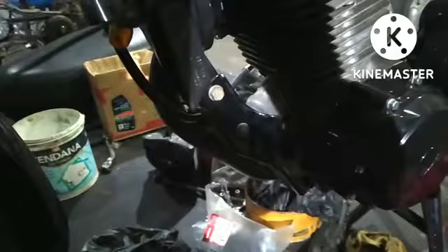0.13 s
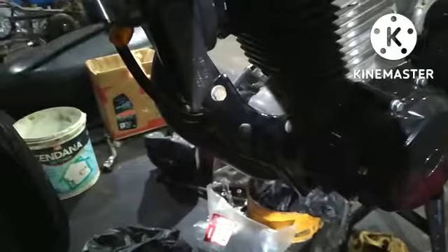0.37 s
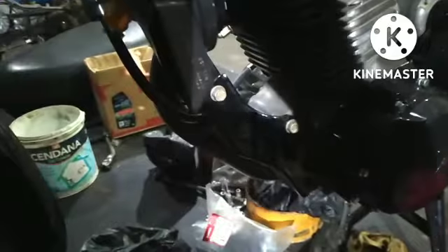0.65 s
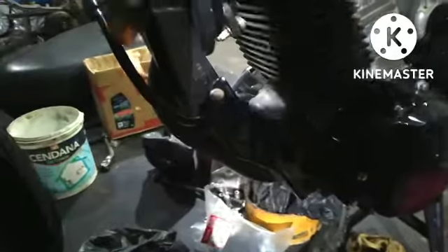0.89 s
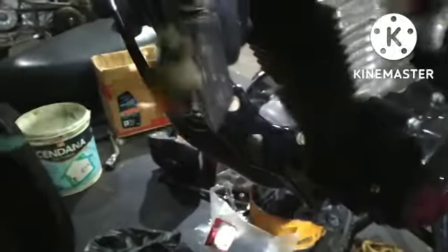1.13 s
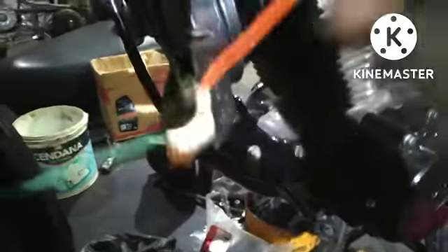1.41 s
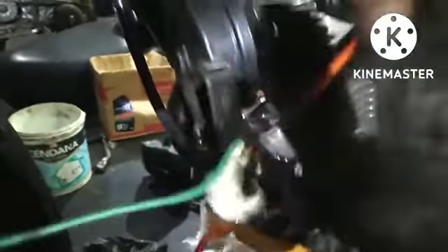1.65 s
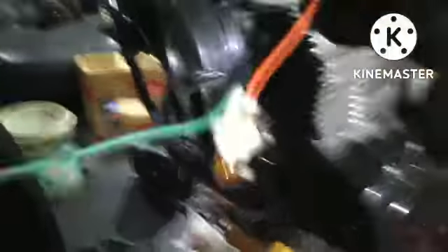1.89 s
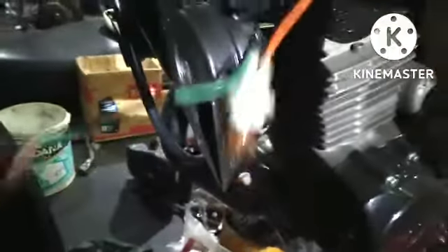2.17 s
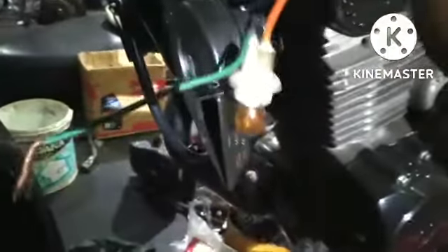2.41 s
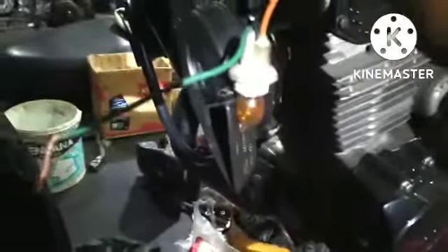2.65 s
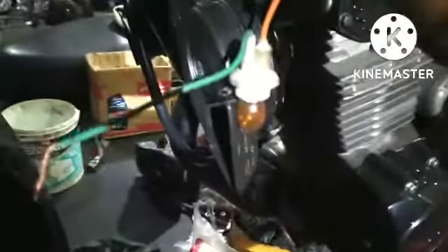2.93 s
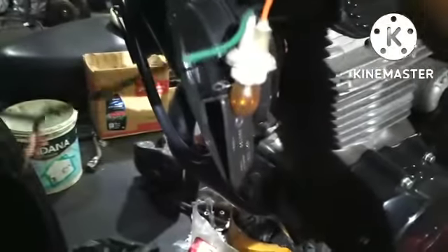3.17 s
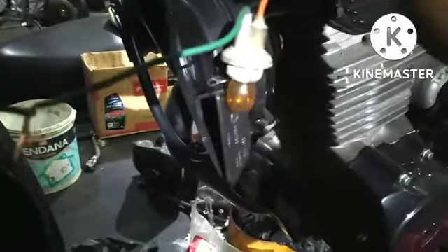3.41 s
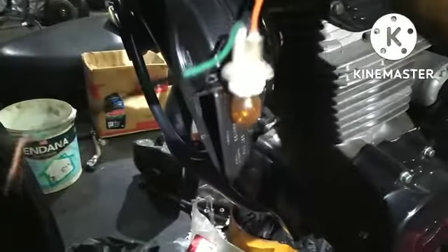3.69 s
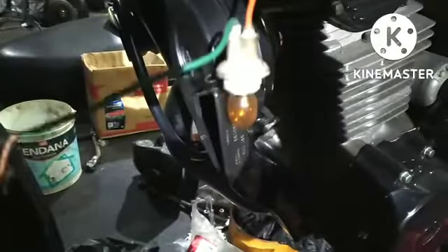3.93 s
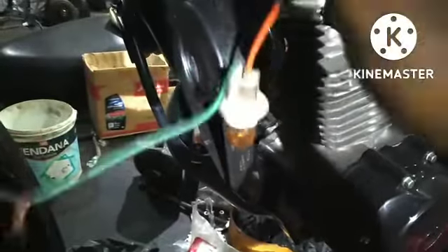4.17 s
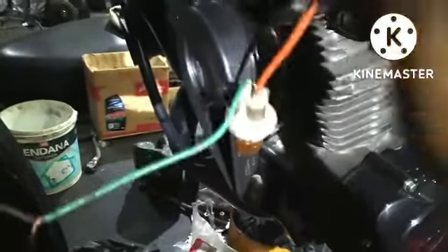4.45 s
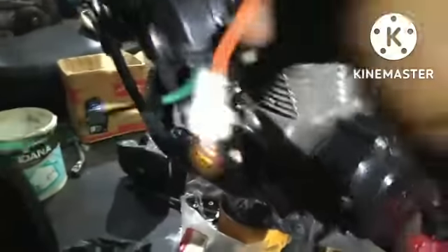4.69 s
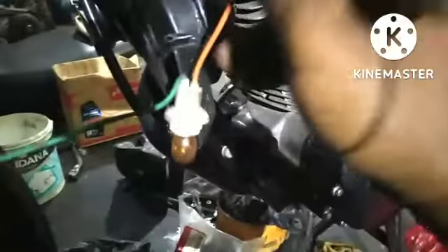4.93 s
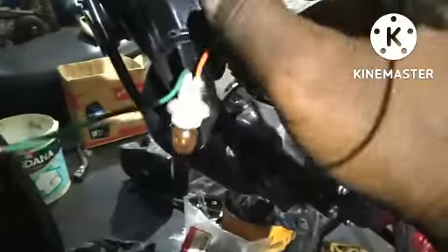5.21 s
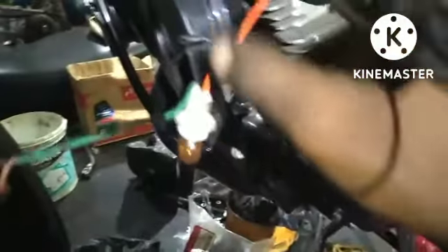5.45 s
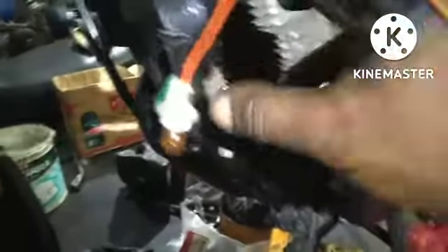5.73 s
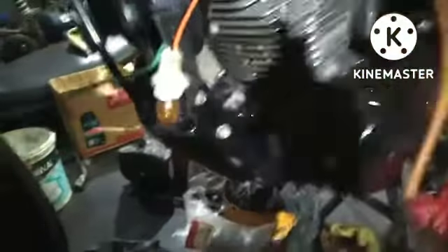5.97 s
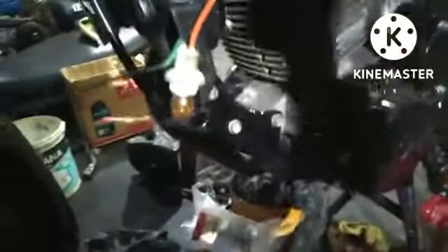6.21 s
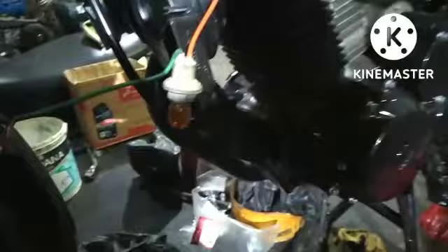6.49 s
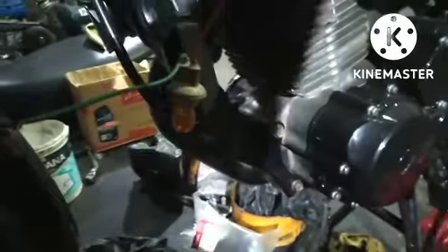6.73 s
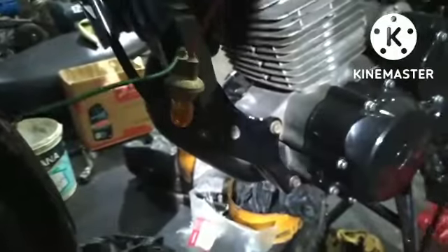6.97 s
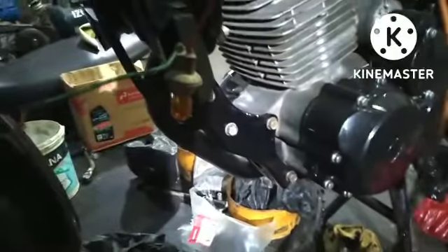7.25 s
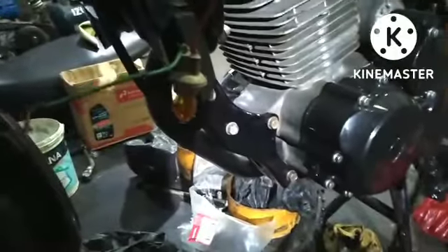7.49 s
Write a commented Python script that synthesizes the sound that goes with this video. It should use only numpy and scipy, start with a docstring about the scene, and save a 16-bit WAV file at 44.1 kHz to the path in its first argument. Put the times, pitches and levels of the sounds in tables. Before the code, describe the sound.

Small wire ends and a lamp holder click and clink close by, with bright scrubbing strokes over a faint distant compressor drone and puffing hiss.

```python
"""A workshop: a compressor drones far off as steady shaft harmonics, over a hiss that puffs once a shaft turn.
A bright scrubbing hiss comes in strokes: noise in many narrow bands that come and go.
Wire ends and a small lamp holder click and clink on metal close by: blows ring short modes, loose parts rattle.
Brief thin tones are rough and narrow with a flickering level; brief pings are soft, trembling tones."""
import sys
import numpy as np
from scipy import signal
from scipy.fft import rfft, irfft
from scipy.io import wavfile
from scipy.ndimage import map_coordinates

SR = 44100
rng = np.random.default_rng(int(sys.argv[2]) if len(sys.argv) > 2 else 0)


def gain_from_db(level_db):
    """Convert decibel levels to linear amplitude factors (20 dB per decade)."""
    decades = np.asarray(level_db, float) / 20
    return 10 ** decades


def persist_wave(psi):
    """Save psi, clipped to +-1, as 16-bit WAV."""
    counts = np.round(np.clip(psi, -1, 1) * 32767).astype(np.int16)
    wavfile.write(sys.argv[1], SR, np.atleast_2d(counts).T)


N = 336042
TIME = np.arange(N) / SR
SHAFT_HZ = 23.949

# Compressor harmonics with levels of their own: multiple of the shaft rate, level_db (relative)
HARMONICS = [(1, -35), (2, -15), (3, -17), (4, -8), (5, -6.5), (6, -7), (7, -10), (8, -0.5), (9, -13),
             (10, -24.5), (11, -7), (12, 1), (13, -16.5), (14, -12), (15, -17.5), (16, -4), (19, -10.5),
             (29, -9), (30, -9), (34, -5), (36, -5.5), (41, -8), (42, -5), (61, -13.5), (62, -6.5)]
# Colour of the workshop hiss: pitch_hz, density_db (per Hz, relative)
HISS_COLOUR = [(18, -32), (30, -9), (187, -7), (237, -1.5), (284, -6.5), (332, -13), (389, -7),
               (505, -16.5), (606, -2.5), (852, -3.5), (1360, -10.5), (2910, -10.5), (4660, -15),
               (7700, -13.5), (8720, -12.5), (10200, -9), (12200, -14), (15500, -17.5)]
# Brief thin tones: start_s, length_s, level_db (before the flicker), pitch_hz
THIN_TONE_EVENTS = [(0.562, 0.073, -58, 2890), (1.541, 0.078, -50.5, 2723), (1.808, 0.035, -51.5, 2740),
                    (1.971, .18, -54.5, 2756), (2.431, .08, -56, 2745), (2.499, 0.057, -51.5, 4995),
                    (2.811, 0.031, -53, 2690), (2.95, 0.097, -58, 3520), (2.982, 0.047, -59.5, 2730),
                    (3.98, 0.18, -53.5, 2740), (4.555, 0.13, -54, 2715), (4.832, 0.069, -53, 2743),
                    (5.139, 0.072, -52, 2730), (5.336, 0.166, -59, 2746), (5.87, 0.03, -60, 2720),
                    (6.12, 0.21, -59.5, 2855), (6.6, 0.079, -63, 2950), (6.74, 0.048, -58.5, 2352),
                    (6.907, 0.035, -52.5, 3590), (7.05, 0.12, -56, 3590)]
# Single pings: start_s, peak_db (before the trim and tremble), pitch_hz, length_s
PING_EVENTS = [(0.0044, -46.5, 8560, 0.022), (0.0638, -55, 8600, 0.02), (0.127, -56.5, 1255, 0.06),
               (0.403, -55, 8590, 0.048), (0.59, -49.5, 1245, 0.025), (0.689, -58, 1150, 0.02),
               (0.776, -49, 8320, 0.026), (0.82, -51, 8900, 0.02), (0.908, -46, 720, 0.049),
               (1.155, -52.5, 1467, 0.053), (1.401, -50, 1093, 0.021), (1.611, -41, 7920, 0.019),
               (1.654, -45.5, 9150, 0.022), (1.781, -35, 8300, 0.011), (1.82, -38, 7900, 0.02),
               (1.872, -52, 540, 0.019), (2.066, -44.5, 5900, 0.023), (2.158, -41, 7900, 0.016),
               (2.303, -50, 1300, 0.037), (2.407, -47, 7700, 0.015), (2.451, -46, 3460, 0.026),
               (2.714, -41.5, 5660, 0.021), (2.875, -43.5, 2100, 0.0098), (3.181, -36, 11200, 0.023),
               (3.217, -51.5, 1277, 0.034), (3.45, -57, 1093, 0.058), (3.744, -54, 4660, 0.022),
               (4.41, -54, 1680, 0.045), (4.766, -48, 5320, 0.013), (5.381, -51.5, 567, 0.025),
               (5.382, -49.5, 2130, 0.02), (5.495, -43.5, 3740, 0.014), (5.662, -46, 10500, 0.02),
               (5.674, -48, 5310, 0.013), (5.802, -54, 3340, 0.032), (5.908, -51.5, 3350, 0.037),
               (6.323, -52, 4430, 0.02), (6.76, -53, 4080, 0.022), (7.188, -47.5, 655, 0.0094)]
# Pitches that the fainter pings pick from: pitch_hz
FAINT_PITCHES = [1340, 1470, 2100, 2800, 2950, 3570, 4440, 5690, 7700, 8590]
# Clicks: start_s, peak_db (before a small trim), low_edge_hz, high_edge_hz,
# rattle_db (over the click, before a trim), rattle_t60_s (time to fall 60 dB)
CLICK_EVENTS = [(0.001, -34, 1100, 1830, -7.5, 0.22), (0.001, -34, 1840, 3250, -2, 0.3),
                (0.001, -38.5, 3570, 4820, -3, 0.21), (0.762, -28, 3830, 6860, -14, 0.15),
                (1.8636, -19, 1910, 5730, -19.5, 0.32), (1.8631, -17, 5650, 10400, -19.5, 0.28),
                (2.605, -21, 1950, 2900, -3.5, 0.064), (2.602, -16.5, 3480, 12100, -17, 0.18),
                (2.713, -27.5, 1850, 2800, -17, 0.081), (4.63, -42.5, 1900, 2880, 7.5, 0.06)]
# Modes of a connector that a click strikes: pitch_hz, width_hz, level_db
CONNECTOR_MODES = [(2770, 510, -2.5), (3650, 660, -1.5), (4440, 460, -0.5), (5550, 1000, 0), (6590, 170, 0),
                   (7100, 400, 1), (8600, 600, -4), (10400, 360, -7), (10900, 500, 8)]
# Clinks of the lamp holder: start_s, level_db
CLINK_EVENTS = [(2.604, -28.5), (2.695, -43), (2.716, -42), (4.633, -51.5)]
# Modes of the lamp holder: pitch_hz, width_hz, level_db, t60_s (time to fall 60 dB)
HOLDER_MODES = [(2069, 98, -8.5, 0.5), (2580, 350, -35, 0.055), (2740, 110, -8.5, 0.21),
                (4560, 780, -15, 0.29), (5650, 31, -8, 0.23), (6240, 150, -13, 0.026)]
# Scrubbing strokes: start_s, length_s, start_db, midway_db, last_push_db (before the contact lifts)
STROKE_EVENTS = [(0.953, 0.54, -51, -55.5, -45.5), (1.663, 0.25, -47.5, -51, -40),
                 (2.033, 0.11, -43, -44.5, -45.5), (2.397, .48, -40.5, -38, -34.5),
                 (3.159, .21, -48, -40.5, -36), (3.692, 0.83, -45, -43.5, -42), (4.664, 0.5, -46, -47, -42),
                 (5.287, 0.24, -50, -46.5, -38.5), (5.644, 0.3, -47, -40, -44),
                 (6.058, .56, -48, -39, -43.5), (6.715, .28, -50, -39, -38),
                 (7.122, 0.39, -44.5, -36.5, -41)]
# Colour of the scrubbing: pitch_hz, density_db (per Hz, relative)
SCRUB_COLOUR = [(2940, -51), (5000, 13), (5790, -29.5), (5900, -22.5), (6370, -13.5), (6710, -10),
                (7060, -12.5), (7800, -6), (8300, -1.5), (9750, -3.5), (10800, 2.5), (11400, 1.5),
                (13800, -11.5), (14900, -4.5), (15500, -8)]
# Outer scrubbing bands over the middle one, for a stroke of usual level:
# time_s, dull_edge_db, low_ring_db, bright_edge_db
BAND_BALANCE = [(1.0, -15, -9, -6), (1.3, -2, 4, -3), (1.55, -14, -2, -14), (1.9, 0, -4, 0),
                (2.12, -9.5, -7.5, -7), (2.45, -18.5, -8, -2), (2.85, -16, -7, 1), (3.25, -11, -12.5, -1),
                (3.9, -8, -3, 4), (4.4, -6.5, -7.5, 1), (4.9, -12, -4, -3.5), (5.452, -4.5, -8, 3),
                (5.8, -16, -10, 1), (6.2, -13.5, -4, 4), (6.9, -18, -9.5, 1.5), (7.35, -17, -10, 7)]


def noise():
    """White noise."""
    return rng.standard_normal(N)


def set_level(x, db):
    """Scale a sound to an rms level."""
    return x * gain_from_db(db) / np.sqrt(np.mean(x ** 2))


def walk(rate):
    """Random levels joined by straight lines, rate of them a second."""
    knots = rng.standard_normal(1000)
    return np.interp(TIME * rate, np.arange(1000), knots)


def resonate(x, hz, width_hz):
    """One resonance, gain 1 at its centre."""
    return signal.lfilter(*signal.iirpeak(min(hz, .45 * SR), hz / width_hz, fs=SR), x)


def coloured(points):
    """Noise whose spectrum follows pitch and level points."""
    hz, db = np.transpose(points)
    bins = np.arange(1, N // 2 + 2) * SR / N
    gain = gain_from_db(np.interp(np.log(bins), np.log(hz), db))
    return irfft(rfft(noise()) * gain, N)


def steep(x, low_hz, high_hz):
    """Band-pass with sharp edges."""
    edges = (.85 * low_hz, min(1.12 * high_hz, .45 * SR))
    return signal.sosfilt(signal.cheby2(5, 40, edges, "band", fs=SR, output="sos"), x)


def patchy(x, patch_hz, patch_s, depth_db, lift_db, above=0.81):
    """Narrow bands of a sound swell and fade, each in its own time; strong swells stand out further."""
    hz, s, frames = signal.stft(x, SR, nperseg=1024, noverlap=768)
    place = np.meshgrid(np.floor(hz / patch_hz), s / patch_s, indexing="ij")
    field = map_coordinates(rng.standard_normal((400, 600)), place, order=1, mode="wrap")
    gain = gain_from_db(depth_db * field + lift_db * np.clip(field - above, 0, .8))
    return signal.istft(frames * gain, SR, nperseg=1024, noverlap=768)[1][:N]


def puffs(depth):
    """A gain that jumps up once a shaft turn and dies away until the next, like puffs of air."""
    left_of_turn = -(TIME * SHAFT_HZ + .55) % 1  # falls from 1 to 0
    return 1 + depth * np.exp(left_of_turn / 1.16)


def add(out, s, sound):
    """Mix a short sound in at a time."""
    i = max(int(s * SR), 0)
    out[i:i + len(sound)] += sound[:N - i]


def compressor():
    """A turning shaft gives steady harmonics, each wavering a little."""
    others_db = -17 + 0.5 * rng.standard_normal(size=63)  # the other multiples, all near one level
    levels = dict(enumerate(others_db)) | dict(HARMONICS)
    t = TIME[::8]  # low tones need only an eighth of the samples
    tones = np.zeros(len(t))
    for k in range(1, len(levels)):
        gain = gain_from_db(levels[k] + walk(4.8)[::8])  # wavers by about 1 dB
        tones += gain * np.sin(2 * np.pi * (k * SHAFT_HZ * t + rng.random()))
    return set_level(signal.resample_poly(tones, 8, 1)[:N], -64.5)


def workshop_hiss():
    """Coloured noise puffs once a shaft turn and narrow bands of its upper part flicker."""
    low_cut = signal.butter(4, 45, "high", fs=SR, output="sos")
    hiss = signal.sosfilt(low_cut, coloured(HISS_COLOUR)) * puffs(1.0)
    upper = steep(coloured(HISS_COLOUR), 920, 10560)
    flicker = patchy(upper, 190, .04, 1.34, 11.2) * puffs(0.84)
    return set_level(hiss, -61) + set_level(flicker, -64.0)


def thin_tones():
    """Brief, rough narrow tones, a sine plus a narrow band of noise, with a flickering level."""
    edge_s, width_hz, roughness = .012, 40, .45
    out, source = np.zeros(N), noise()
    for s, length, db, hz in THIN_TONE_EVENTS:
        t = TIME[:int((length + 4 * edge_s) * SR)]
        rough = set_level(resonate(source[int(s * SR):][:len(t)], hz, width_hz), 0)
        tone = np.sin(2 * np.pi * hz * t) + roughness * rough
        rise = 1 - np.exp(-t / edge_s)
        fall = np.exp(-np.maximum(t - length, 0) / edge_s)
        add(out, s, set_level(tone, db) * rise * fall)
    flicker_db = 5 * walk(48) - 2.5
    return out * gain_from_db(flicker_db)


def pings():
    """Short soft tones swell and fade, blurred by a tremble; fainter ones come at random."""
    out, faint = np.zeros(N), []
    for when, size, pick, long in rng.random(size=(60, 4)):
        db = -61 - 2.5 * np.log(size)  # a few come out much louder
        hz = FAINT_PITCHES[int(pick * len(FAINT_PITCHES))]
        faint.append((when * N / SR, db, hz, .03 * (.5 + long)))
    for s, db, hz, length in PING_EVENTS + faint:
        t = TIME[:int(2 * length * SR)]
        swell = t / length * 4
        envelope = swell * np.exp(1 - swell)  # peaks at a quarter of the length
        tone = np.sin(2 * np.pi * (hz * t + rng.random()))
        add(out, s - .004, gain_from_db(db - 2.0) * envelope * tone)
    tremble_db = 3.9 * walk(120)
    return out * gain_from_db(tremble_db)


def clicks():
    """A blow rings the connector's short modes for a few ms, then loose parts rattle in a band."""
    out, t = np.zeros(N), TIME[:SR // 2]
    loose = set_level(patchy(noise(), 240, .12, 3.5, 5.0), 0)
    for s, db, low_hz, high_hz, rattle_db, t60 in CLICK_EVENTS:
        # one sharp sample and a short burst of noise
        blow = (t == 0) + 0.3 * np.exp(-t / 0.0023) * rng.standard_normal(len(t))
        ringing = sum(gain_from_db(g) * resonate(blow, hz, width) for hz, width, g in CONNECTOR_MODES)
        crack = steep(ringing, low_hz, high_hz)
        add(out, s, gain_from_db(db + 0.5) * crack / np.abs(crack).max())
        shaken = set_level(steep(np.roll(loose, -int(s * SR))[:len(t)], low_hz, high_hz), -1.2)
        add(out, s, gain_from_db(db + rattle_db - 60 * t / t60) * (1 - np.exp(-t / 0.0052)) * shaken)
    return out


def clinks():
    """The loose lamp holder chatters, so its modes ring roughly, with a brief clean ring at the start."""
    strike_db, strike_t60_s = 8.5, 0.035
    out, t = np.zeros(N), TIME[:SR // 2]
    for s, db in CLINK_EVENTS:
        rings = np.zeros(len(t))
        for hz, width, g, t60 in HOLDER_MODES:
            rough = resonate(resonate(rng.standard_normal(len(t)), hz, width), hz, width)
            rings += set_level(rough, 0) * gain_from_db(g - 60 * t / t60)
            clean = np.sin(2 * np.pi * (hz * t + rng.random()))
            rings += clean * gain_from_db(g + strike_db - 60 * t / strike_t60_s)
        add(out, s, gain_from_db(db) * rings * (1 - np.exp(-t / 0.00033)))
    return out


def strokes():
    """Pressure of the contact in dB, and a gain that opens fast and fades when the contact lifts."""
    attack_s, release_db_per_s = 0.035, 319
    lift_s = 0.044  # the fade eases in over about this time
    midway, sag_db = 0.57, -2.5  # share of the time up to the last push; sag below midway just before it
    knots, contact = [], np.zeros(N)
    for s, length, first_db, mid_db, last_db in STROKE_EVENTS:
        push = min(0.1, length / 4)  # seconds of the last push
        knots += [(s, first_db), (s + midway * (length - push), mid_db)]
        knots += [(s + length - push, mid_db + sag_db), (s + length, last_db)]
        lifted = np.maximum(TIME - s - length, 0)
        fade_db = -release_db_per_s * (np.hypot(lifted, lift_s) - lift_s)
        opening = np.clip((TIME - s) / attack_s, 0, 1) ** 2
        contact = np.maximum(contact, opening * gain_from_db(fade_db))
    return np.interp(TIME, *np.transpose(knots)) + 1.2 * walk(14), contact


def scrubbing():
    """Bright hiss in strokes, in many narrow bands that come and go."""
    db, contact = strokes()
    usual_db = -46
    follows = (1, 0.54, 0.35)  # share of a change from the usual level that dull, ring and bright follow
    s, *columns = np.transpose(BAND_BALANCE)
    gains = []
    for column, follow in zip(columns, follows):
        balance_db = np.interp(TIME, s, column) + (follow - 1) * (db - usual_db)
        gains.append(gain_from_db(balance_db + walk(11)))
    lasting = patchy(coloured(SCRUB_COLOUR), 90, .3, 1.0, 14.0, above=-0.39)
    sputter = patchy(lasting, 90, .05, 1.0, 24.0, above=-0.33) * puffs(.4)
    bins = np.arange(N // 2 + 1) * SR / N
    part = np.digitize(bins, (5500, 8000, 9000, 12500))  # band edges in Hz; the part below them is left out
    spectrum = rfft(sputter)
    dull, ring, middle, bright = (set_level(irfft(spectrum * (part == k), N), 0) for k in (1, 2, 3, 4))
    stroke = gains[0] * dull + gains[1] * ring + middle + gains[2] * bright
    # lower down scattered narrow patches of noise flicker, growing half as fast in dB as the stroke
    patches = set_level(patchy(steep(noise(), 1860, 7540), 130, .045, 3.3, 12.0), -45)
    # one resonance outlasts each stroke and stays faintly on in between
    sing_hz, sing_width_hz = 8660, 190
    sing = resonate(resonate(noise(), sing_hz, sing_width_hz), sing_hz, sing_width_hz)
    sing = set_level(sing * gain_from_db(7.6 * walk(30)) * puffs(.8), -53.5)
    sing = sing * (contact ** 0.26 + gain_from_db(-22))
    return gain_from_db(db) * contact * stroke + gain_from_db(db / 2) * np.sqrt(contact) * patches + sing


def scene():
    """One microphone feeds both channels."""
    background = compressor() + workshop_hiss() + thin_tones() + pings()
    mono = background + clicks() + clinks() + scrubbing()
    return np.array([mono, mono])


def band_limit(x):
    """A steep low-pass at the top of the band."""
    return signal.sosfilt(signal.butter(12, 16410, fs=SR, output="sos"), x)


def record(dry):
    """A steep filter cuts the top of the treble to finish the mix."""
    top_cut = signal.ellip(8, .2, 70, 15550, fs=SR, output="sos")
    mix = signal.sosfilt(top_cut, dry)
    return band_limit(mix)


dry = scene()
out = record(dry)
persist_wave(out)
```